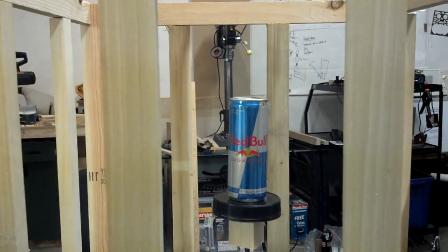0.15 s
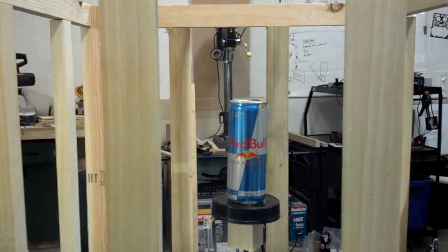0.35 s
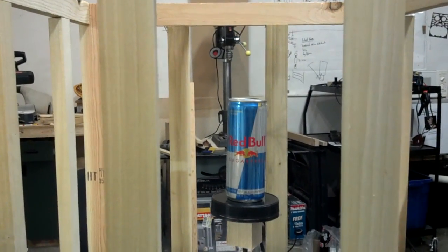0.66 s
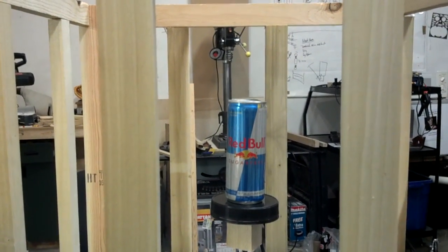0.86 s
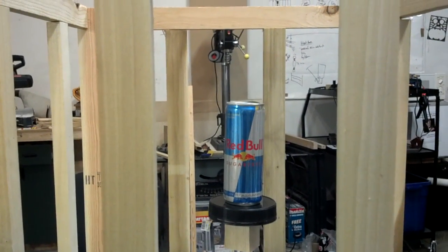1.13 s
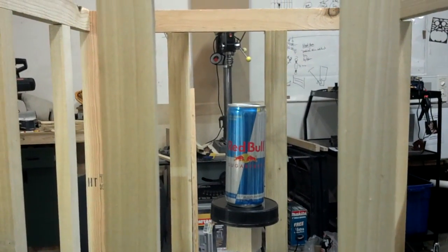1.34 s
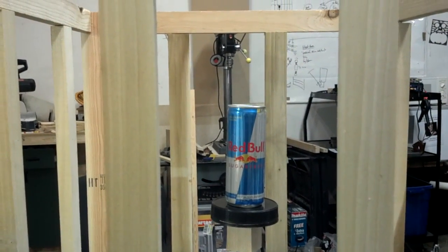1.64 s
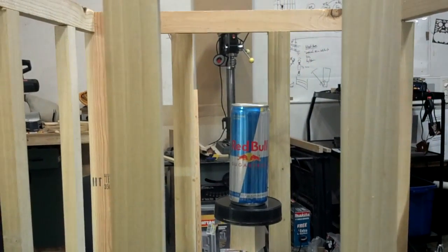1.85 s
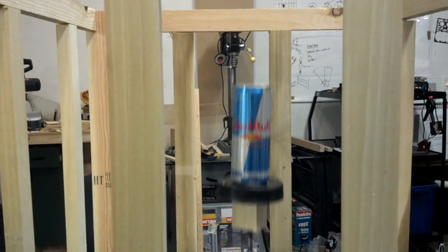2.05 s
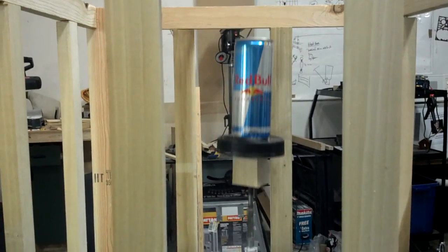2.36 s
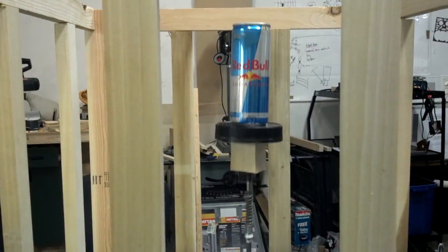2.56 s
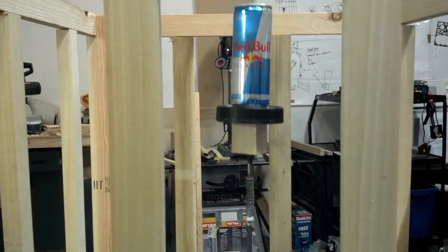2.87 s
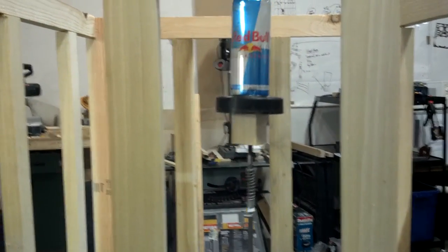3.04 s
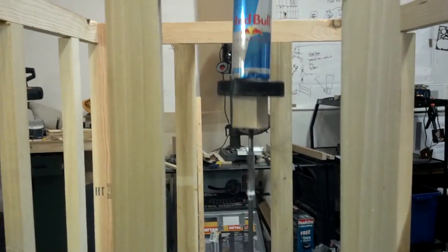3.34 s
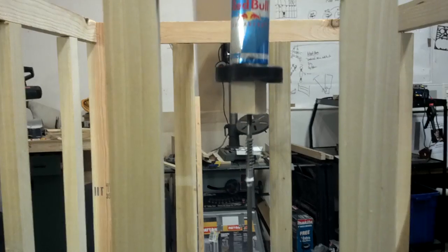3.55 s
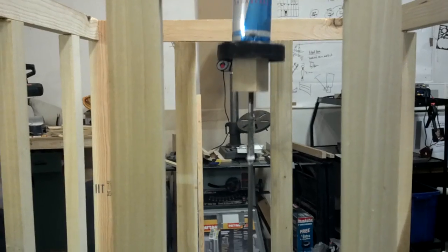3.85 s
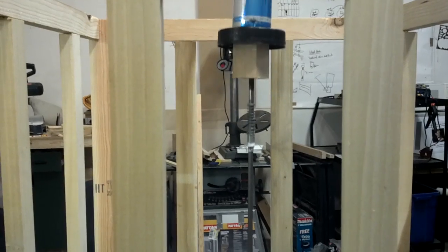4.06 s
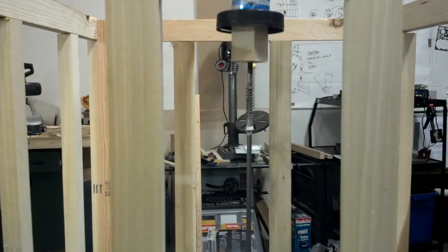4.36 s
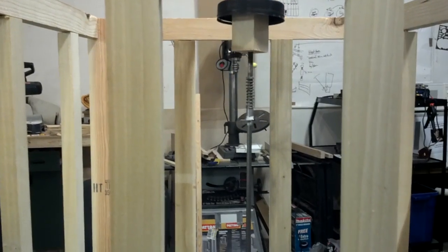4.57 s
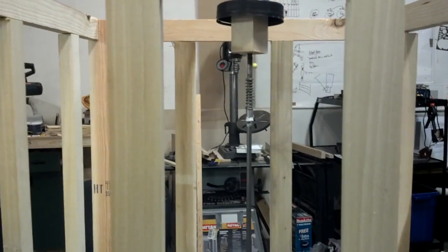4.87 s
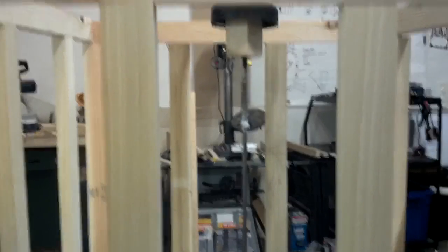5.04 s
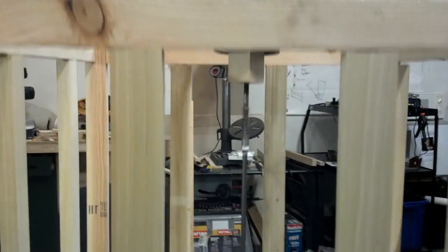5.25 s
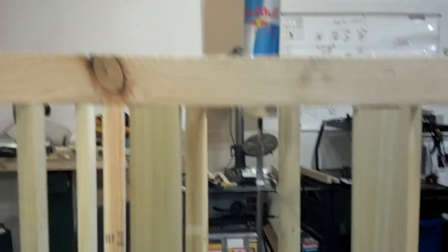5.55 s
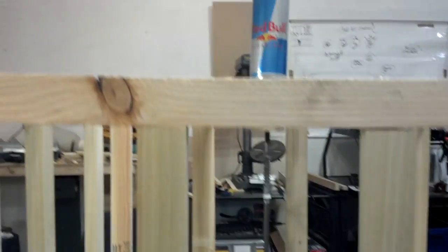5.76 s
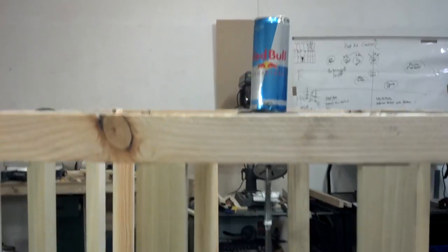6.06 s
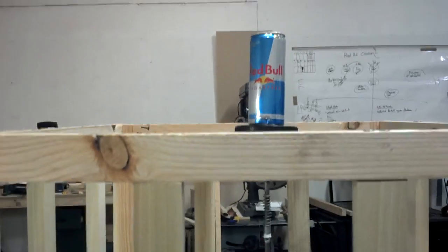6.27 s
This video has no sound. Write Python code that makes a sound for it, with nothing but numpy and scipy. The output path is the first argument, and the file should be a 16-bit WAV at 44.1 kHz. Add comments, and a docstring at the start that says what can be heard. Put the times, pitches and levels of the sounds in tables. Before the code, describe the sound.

A loud, even compressor already at full speed: reedy midrange honk, fuzzy housing whine, bright turbulent hiss and tight valve chatter, wide in stereo with a very short room tail. Around two seconds a soft wavering hum surges, then holds as the low drone fades and strokes become uneven. After five seconds, raising the microphone dulls the ticking and brings up the rushing air, which continues to the cut.

```python
"""A small piston air compressor honks, rattles and hisses at about 53 strokes a second, slowing slightly.
Valves ring each stroke, turbulent air is pumped in puffs, and crank multiples drone through the housing.
From 2.08 s to 4.7 s a faint hum marks the piston's climb; the drone mostly fades and strokes turn unequal.
From 5.32 s the microphone is raised: the whistle and valve chatter weaken, the rush grows.
Throughout, the two channels differ in phase and colour, with a short diffuse tail behind the machine."""
import sys
import numpy as np
from scipy import signal
from scipy.fft import rfft, irfft, next_fast_len
from scipy.io import wavfile
from scipy.ndimage import map_coordinates

SR = 44100
rng = np.random.default_rng(int(sys.argv[2]) if len(sys.argv) > 2 else 0)


def master_out(mix):
    """Clip the mix to full scale and print it as 16-bit PCM to the path in sys.argv[1]."""
    frames = np.transpose(np.atleast_2d(mix))
    ceiling = np.clip(frames, -1, 1)
    pcm = np.round(ceiling * 32767).astype(np.int16)
    wavfile.write(sys.argv[1], SR, pcm)


N = 282681

# force of the valves: t/s, level/dB
VALVE_FORCE = [(0, -25.5), (1.25, -26.3), (1.6, -26.3), (4.2, -25.7), (5.45, -23.9), (5.62, -26.7),
               (5.8, -24.5), (6.41, -25.2)]
# the microphone is raised
RAISE_S, RAISE_LENGTH_S = 5.32, 0.4
# main resonance of the housing: centre, half width
RING_HZ, RING_WIDTH_HZ = 1392, 10
# the piston's climb loads the pump
LIFT_START_S, LIFT_END_S = 2.08, 4.7


def amp(db):
    """Decibels to gain."""
    return 10 ** (np.asarray(db) / 20)


def unit(x):
    """Scale to rms 1."""
    return x / np.sqrt(np.mean(x ** 2) + 1e-20)


def along(points, hz):
    """Interpolate (f/Hz, value) points on a log frequency axis."""
    f, v = np.transpose(points)
    return np.interp(np.log(hz + 1), np.log(f + 1), v)


def curves(rows):
    """One value per sample for each column after the time."""
    s, *cols = np.transpose(rows)
    return [np.interp(np.arange(N) / SR, s, c) for c in cols]


def ramp(start_s, length_s):
    """Linear rise from 0 to 1."""
    return np.clip((np.arange(N) / SR - start_s) / length_s, 0, 1)


def wobble(knots_per_s):
    """Smooth random curve through normally distributed knots."""
    knots = rng.standard_normal(int(N * knots_per_s / SR) + 4)
    return map_coordinates(knots, [np.arange(N) * knots_per_s / SR])


def filtered(x, response):
    """Multiply the spectrum of x by a complex response of frequency."""
    m = next_fast_len(N + SR // 2)
    return irfft(rfft(x, m) * response(np.fft.rfftfreq(m, 1 / SR)), m)[..., :N]


def noise(spectrum, turn, repeat, count):
    """Coloured noise of rms 1; the power share repeat recurs every count strokes."""
    per_stroke = int(N / (turn[-1] - turn[0]))
    cycle = rng.standard_normal(count * per_stroke)
    pattern = map_coordinates(cycle, [turn % count * per_stroke], mode="grid-wrap")
    white = np.sqrt(1 - repeat) * rng.standard_normal(N) + np.sqrt(repeat) * pattern
    return unit(filtered(white, lambda hz: amp(along(spectrum, hz))))


def bursts(turn, speed, place, hz, half_s, scatter_s, size_db, stretch):
    """One Gaussian-swelled ring per stroke; size, length and timing vary from stroke to stroke."""
    stroke = np.round(turn - place).astype(int)
    late, size, long = rng.standard_normal((512, 3))[stroke].T
    t = (turn - place - stroke) / speed + scatter_s * late
    swell = np.exp(-(t / (half_s * np.exp(stretch * long))) ** 2)
    return amp(size_db * size) * swell * np.cos(2 * np.pi * hz * t)


def ringing(speed):
    """Housing ring gain, highest when a multiple of the stroke rate meets its resonance."""
    base_db, rise_db = -8, 7.5
    detune_hz = RING_HZ - speed * np.round(RING_HZ / speed)
    return amp(base_db + rise_db / (1 + (detune_hz / RING_WIDTH_HZ) ** 2))


def valves(turn, speed, share=0.27):
    """The reed valve flutters for a few cycles at the top of each stroke; other parts ring around it."""
    # reed flutter: f/Hz, half length/s, level/dB re valve force
    honk_modes = [(1425, .0036, 4.4), (1290, .0025, 5.3)]
    # weaker rings of valves and housing:
    # place in stroke/0-1, f/Hz, half length/s, level/dB re valve force, timing scatter/s
    rattle_modes = [(.66, 1066, 0.0059, -11, 0.000042), (1, 1134, 0.0029, -5.5, 0.00014),
                    (.55, 886, 0.0019, -8, .00009), (.85, 1846, 0.0027, -1.8, .00001),
                    (0.95, 1540, 0.00068, -12, 0.00005), (.61, 3260, 0.0025, -1.2, 0.0000066)]
    # housing ringing on:
    # place in stroke/0-1, f/Hz, half length/s, level/dB re valve force, change when raised/dB
    after_modes = [(.151, 1385, .007, -3.5, -1), (.46, 1410, .003, -9, 11), (.15, 1645, .009, -24, 19)]
    honk = sum(amp(db) * bursts(turn, speed, 0, hz, half_s, scatter_s=.00002, size_db=.45, stretch=.11)
               for hz, half_s, db in honk_modes)
    rattle = sum(amp(db) * bursts(turn, speed, place, hz, half_s, scatter_s, size_db=0.7, stretch=0.22)
                 for place, hz, half_s, db, scatter_s in rattle_modes)
    raised = ramp(RAISE_S, RAISE_LENGTH_S)
    after = sum(amp(db + change_db * raised)
                * bursts(turn, speed, place, hz, half_s, scatter_s=.00002, size_db=0.5, stretch=0.1)
                for place, hz, half_s, db, change_db in after_modes)
    free = ringing(speed)
    # a freely ringing housing takes a share of the honk and draws it out into a whine
    return amp(curves(VALVE_FORCE)[0]) * ((1 - share * free) * honk + free * after + rattle)


def chatter(turn, speed, raised_db=-3):
    """Short valve-plate ticks, nearly steady from stroke to stroke, weaker once the microphone is up."""
    # place in stroke/0-1, f/Hz, half length/s, level/dB re valve force
    plate_ticks = [(.53, 4680, .0014, -3), (.6, 4630, .0007, -3.5), (.79, 4740, .0008, 1.3),
                   (.92, 3720, .0007, -6.5)]
    ticks = sum(amp(db) * bursts(turn, speed, place, hz, half_s, scatter_s=.00002, size_db=0.5, stretch=0.24)
                for place, hz, half_s, db in plate_ticks)
    return amp(curves(VALVE_FORCE)[0] + raised_db * ramp(RAISE_S, RAISE_LENGTH_S)) * ticks


def air(turn):
    """Turbulent air, pumped in two puffs a stroke: a bright hiss, a breathy intake whistle and a lower rush."""
    # two puffs: place in stroke/0-1, half width/strokes, hiss level/dB, rush level/dB
    puff_rows = [(.54, 0.11, 4.5, 2.5), (.86, 0.17, 3.5, 2)]
    # relative spectra: f/Hz, density/dB per Hz
    hiss_spectrum = [(1800, -48), (2500, -17), (2800, -10), (3080, -6), (3260, -3), (3600, -4.5),
                     (4100, -7), (5050, -6), (5500, -3), (5900, -7), (6450, -10.5), (7700, -18),
                     (10400, -12), (11300, -13.5), (12300, -19), (14000, -24.5), (15600, -15.5)]
    whistle_spectrum = [(3800, -30), (4450, -8), (4680, -0.5), (4880, -11), (5600, -32)]
    rush_spectrum = [(60, -27), (100, -26), (200, -28), (340, -23), (560, -19), (735, -16), (835, -3.5),
                     (950, -4.5), (1090, 1), (1280, -2.5), (1600, -2), (1750, -7), (1900, -4.5), (2050, -4),
                     (2300, -4.5), (2500, -11), (2800, -19), (3500, -94)]
    hiss_db, whistle_start_db, rush_db = -27.5, -36, -30
    whistle_fade_db_per_s, raise_whistle_db, raise_rush_db = 1, -4, 2
    # power share of turbulence that recurs with the strokes
    hiss_repeat, whistle_repeat, rush_repeat = 0.22, 0.5, 0.2

    def puff(place, width):
        return np.exp(-(((turn - place + .5) % 1 - .5) / width) ** 2)

    hiss_gate = amp(sum(db * puff(place, width) for place, width, db, _ in puff_rows))
    rush_gate = amp(sum(db * puff(place, width) for place, width, _, db in puff_rows))
    gusts = hiss_gate * amp(1.38 * wobble(300))
    raised = ramp(RAISE_S, RAISE_LENGTH_S)
    whistle_db = whistle_start_db - whistle_fade_db_per_s * np.arange(N) / SR + raise_whistle_db * raised
    hiss = amp(hiss_db) * unit(noise(hiss_spectrum, turn, hiss_repeat, count=1) * gusts)
    whistle = amp(whistle_db) * unit(noise(whistle_spectrum, turn, whistle_repeat, count=1) * gusts)
    rush_noise = unit(noise(rush_spectrum, turn, rush_repeat, count=2) * rush_gate)
    rush = amp(rush_db + raise_rush_db * raised) * rush_noise
    return hiss + whistle + rush


def housing(turn):
    """The crank shakes the housing at stroke-rate multiples; under load most fade and half multiples grow."""
    # housing and motor: multiple of stroke rate, level before load/dB, fall under load/dB per s
    drone_lines = [(2, -56.5, 3), (3, -60.5, 2.5), (4, -57.5, 3), (5, -53.5, 3.5), (6, -59, 1.5),
                   (7, -59, -0.2), (8, -59, 1.5), (9, -58, 2), (10, -56, 4), (11, -64, 0.5),
                   (12.35, -56.5, 0.5), (13, -57, 3), (14, -57.5, 2), (15, -56.5, -0.5),
                   (15.75, -50.5, 0.5), (16.75, -49, 0.5), (17.75, -52, 3)]
    # alternate strokes turning unequal: multiple of stroke rate, relative level/dB
    limp_lines = [(2.5, -68.5), (3.5, -61.5), (4.5, -66), (5.5, -55), (6.5, -63), (7.5, -57.5), (8.5, -59),
                  (9.5, -61), (10.5, -62), (13.3, -55), (14.5, -60.5)]
    limp_db, limp_rise_db, limp_start_s, limp_build_s = -9.5, 7, 2.24, 0.64
    loaded_s = np.maximum(np.arange(N) / SR - LIFT_START_S, 0)

    def line(k):
        return np.sqrt(2) * np.sin(2 * np.pi * (k * turn + rng.random()) + 0.27 * wobble(6))

    drone = sum(amp(db - fall * loaded_s) * line(k) for k, db, fall in drone_lines)
    limp = sum(amp(db) * line(k) for k, db in limp_lines)
    return drone + amp(limp_db + limp_rise_db * ramp(limp_start_s, limp_build_s)) * limp


def whines(turn, fade_s=0.087):
    """The housing rings narrowly all the time as a fuzzy, noisy tone; now and then single lines sing out."""
    # narrow resonances: f/Hz, half width/Hz, level/dB
    panel_rings = [(1586, 22, -45), (1097, 33, -47), (838, 11.7, -48.5)]
    # main resonance: t/s, level/dB
    main_level = [(0, -42), (1.4, -38.5), (2.8, -40), (4, -43), (5.2, -47), (5.8, -42)]
    # singing lines: start/s, end/s, multiple of stroke rate, level/dB
    singing_lines = [(0, 1.9, 21, -39.5), (.55, 1.25, 23, -40), (.2, 1.35, 30, -37.5), (1.3, 1.95, 31, -43),
                     (4.55, 4.9, 31, -44), (5.08, 5.6, 30, -38), (5.12, 5.6, 31, -38.5),
                     (5.5, 6.5, 15, -49)]

    def ring(centre_hz, width_hz):
        white = rng.standard_normal(N)
        return unit(filtered(white, lambda hz: 1 / (1 + ((hz - centre_hz) / width_hz) ** 2)))

    def sing(start_s, end_s, k):
        on = ramp(start_s, fade_s) - ramp(end_s - fade_s, fade_s)
        return np.sqrt(2) * on * np.sin(2 * np.pi * (k * turn + rng.random()))

    panels = sum(amp(db) * ring(centre_hz, width_hz) for centre_hz, width_hz, db in panel_rings)
    main = amp(curves(main_level)[0]) * ring(RING_HZ, RING_WIDTH_HZ)
    lines = sum(amp(db) * sing(start_s, end_s, k) for start_s, end_s, k, db in singing_lines)
    return main + panels + lines


def lift(hum_hz=350, octave_db=-9, fade_s=0.045, waver_db=2.1):
    """A wavering hum with its octave: it surges as the piston breaks loose and holds while it climbs."""
    hum_db, surge_db, surge_s = -50.3, 8, 0.33
    t = np.arange(N) / SR
    on = ramp(LIFT_START_S, fade_s) - ramp(LIFT_END_S - fade_s, fade_s)
    surge = np.exp(-((t - LIFT_START_S) / surge_s) ** 2)
    phase = 2 * np.pi * hum_hz * t + 0.25 * wobble(11)
    level = on * amp(hum_db + surge_db * surge + waver_db * wobble(14))
    return level * (np.sin(phase) + amp(octave_db) * np.sin(2 * phase))


def workshop(x, t60_s=0.13):
    """Room tail: exponentially decaying noise, unrelated between the two sides."""
    t = np.arange(SR // 3) / SR
    tail = rng.standard_normal((2, len(t))) * amp(-60 * t / t60_s)
    return signal.fftconvolve(x[None], tail / np.linalg.norm(tail[0]), axes=1)[:, :N]


def scene():
    """The crank angle times the strokes, air puffs and drone; air also arrives diffusely from all around."""
    # pump speed, sagging as the load grows: t/s, stroke rate/Hz
    speed_curve = [(0, 53.65), (.25, 53.47), (.5, 53.47), (.72, 53.28), (1.05, 53.22), (1.28, 53.04),
                   (1.45, 52.58), (1.73, 52.86), (2.05, 52.5), (2.35, 52.66), (2.56, 52.39), (2.8, 52.66),
                   (3, 52.54), (4.1, 52.47), (4.4, 52.53), (4.68, 52.25), (4.92, 52.58), (5.38, 52.1),
                   (5.52, 52.2), (5.7, 51.3), (6.41, 51.5)]
    # air arriving from all around: f/Hz, level/dB re direct air
    diffuse_share = [(100, -10), (1200, -13), (2150, -9.5), (2400, -35), (2950, -35), (3200, -9),
                     (8000, -13), (15000, -10)]
    speed, = curves(speed_curve)
    # strokes counted so far; whole numbers fall at the top of the stroke
    turn = np.cumsum(speed) / SR - .355
    machine = valves(turn, speed) + chatter(turn, speed) + housing(turn) + whines(turn) + lift()
    # separate draws keep the sides unrelated
    around = filtered(np.array([air(turn), air(turn)]), lambda hz: amp(along(diffuse_share, hz)))
    return machine + air(turn) + around + workshop(amp(-18) * machine)


def record(dry, bass_cut_hz=75, top_hz=15850, port_delay_s=16 / 44100):
    """The right channel lags and is turned in phase; each side has its own colour, thin bass and a band limit."""
    # left minus right: f/Hz, level/dB
    tilt = [(160, 3.5), (300, -0.5), (800, -3), (1400, -2.5), (1900, 2), (2400, 0), (2900, 0), (3300, -11),
            (4000, 3), (4700, -6.5), (6500, 0), (7400, 1.5), (8600, -10), (9800, 1), (11000, -2.5),
            (12500, 0)]
    # right against left, apart from the delay: f/Hz, phase/rad
    twist = [(100, 3.18), (200, 1.84), (400, 0.88), (700, 2.26), (1380, 3.37), (1700, 3.06), (2000, 2.92),
             (2380, 2.29), (2980, 3.65), (3300, 4.06), (3700, 3.195)]

    def ports(hz):
        lead_rad = 2 * np.pi * hz * port_delay_s - along(twist, hz)
        # each side takes half of the level and phase difference
        half = amp(along(tilt, hz) / 2) * np.exp(.5j * lead_rad)
        thin = hz ** 2 / np.hypot(hz ** 2, bass_cut_hz ** 2)
        return np.array([half, 1 / half]) * thin * (hz < top_hz)

    return filtered(dry, ports)


dry = scene()
out = record(dry)
master_out(out)
```